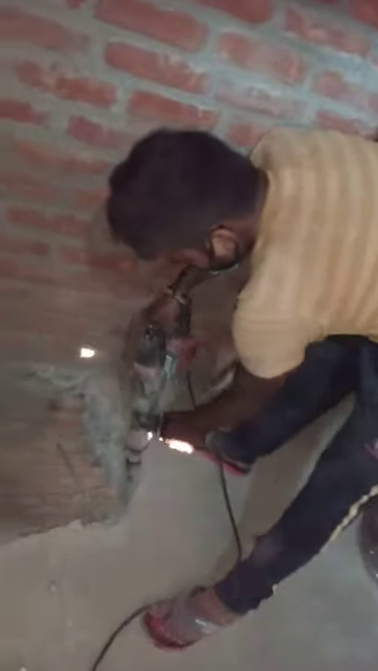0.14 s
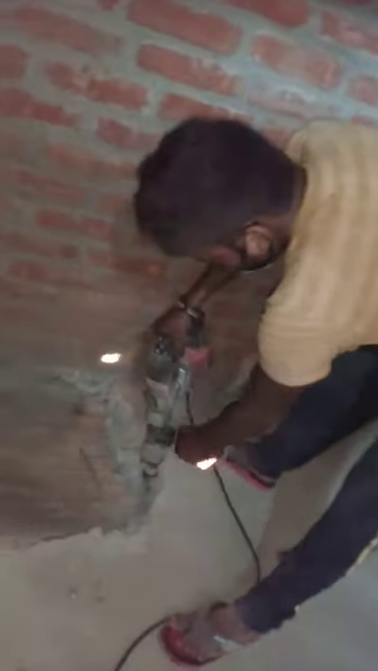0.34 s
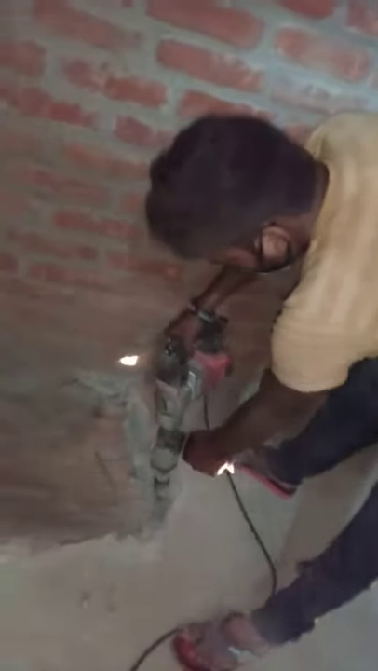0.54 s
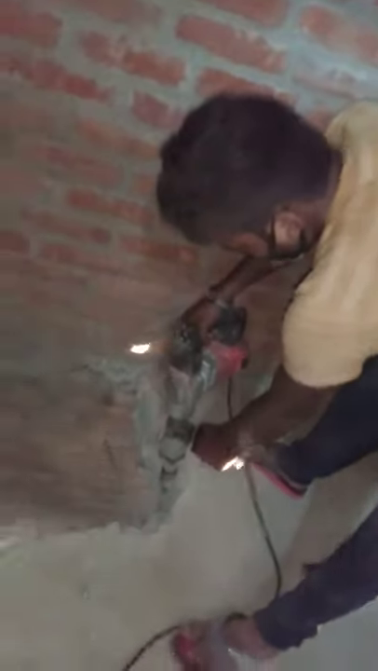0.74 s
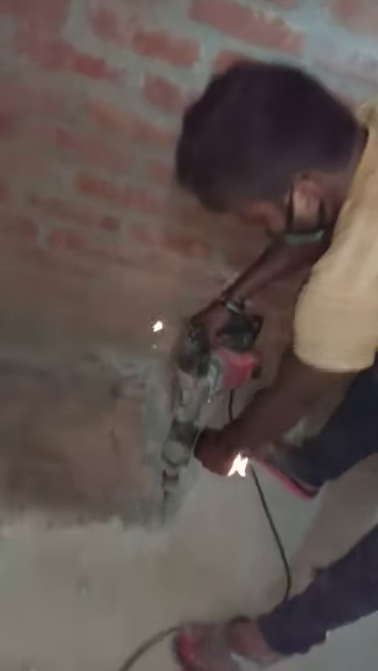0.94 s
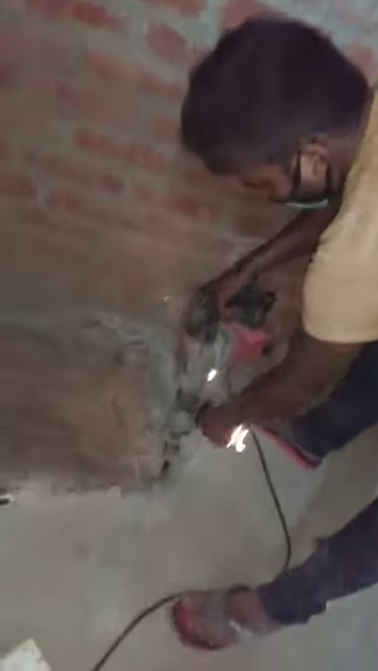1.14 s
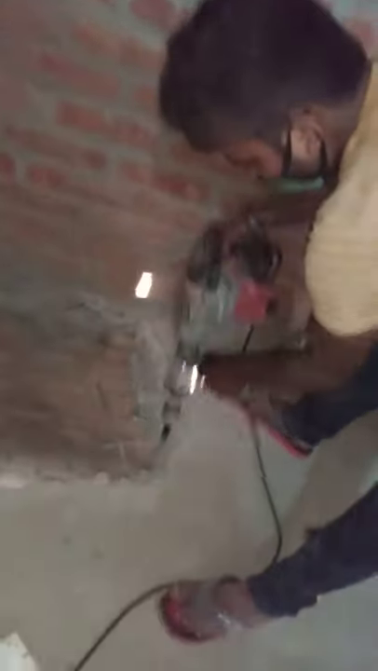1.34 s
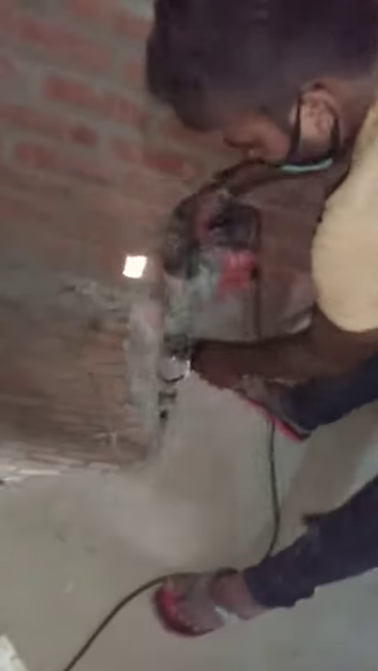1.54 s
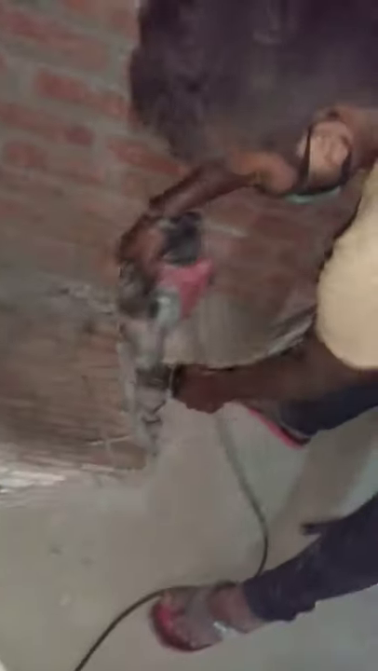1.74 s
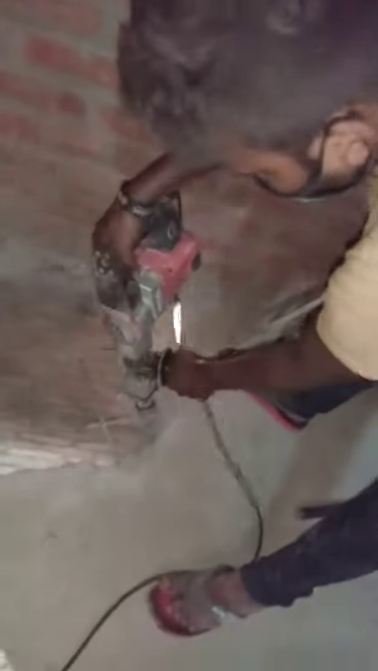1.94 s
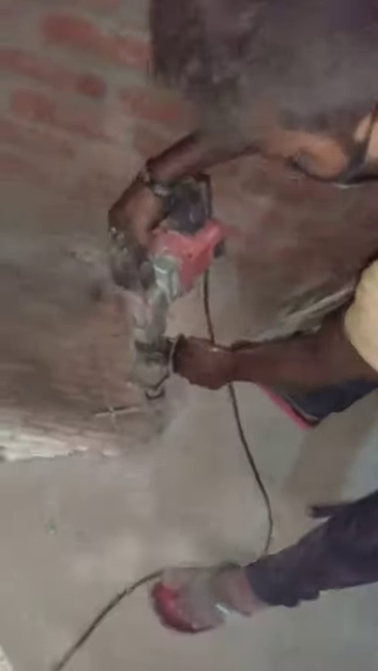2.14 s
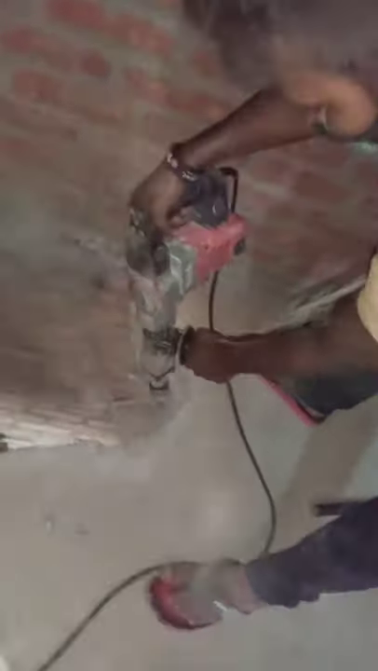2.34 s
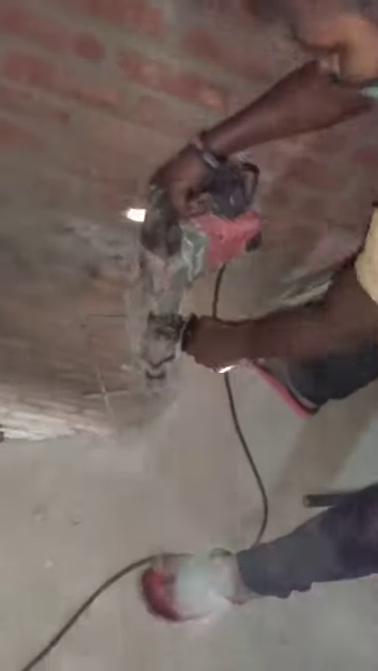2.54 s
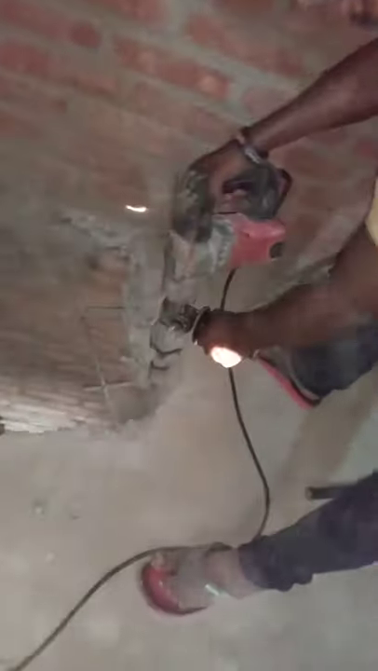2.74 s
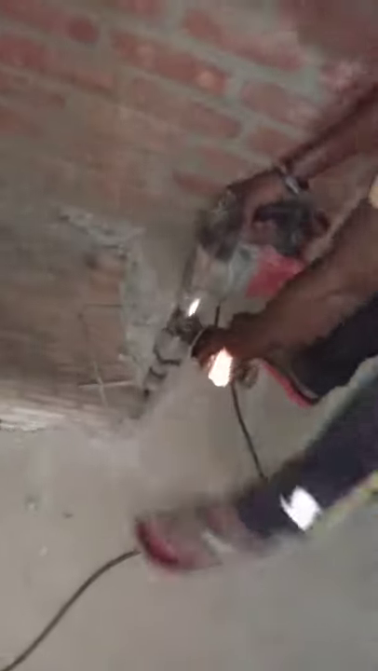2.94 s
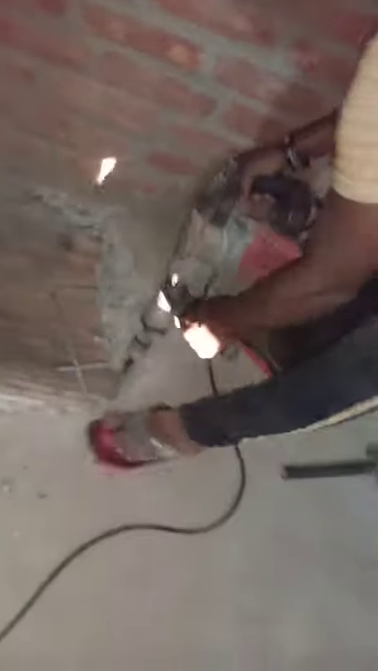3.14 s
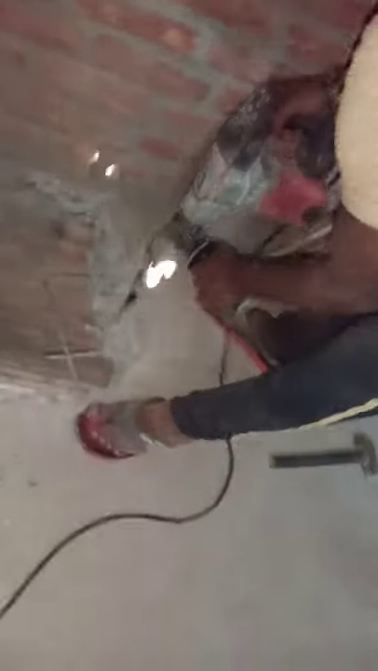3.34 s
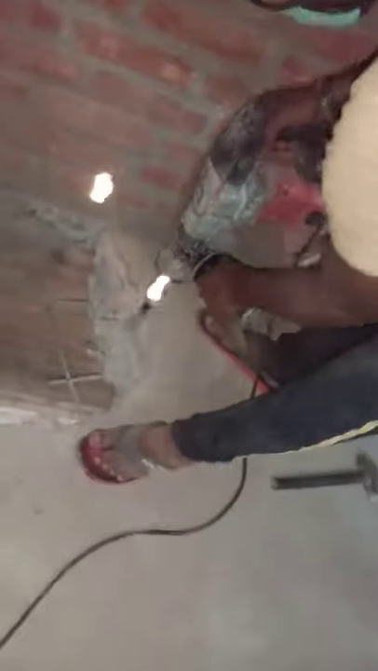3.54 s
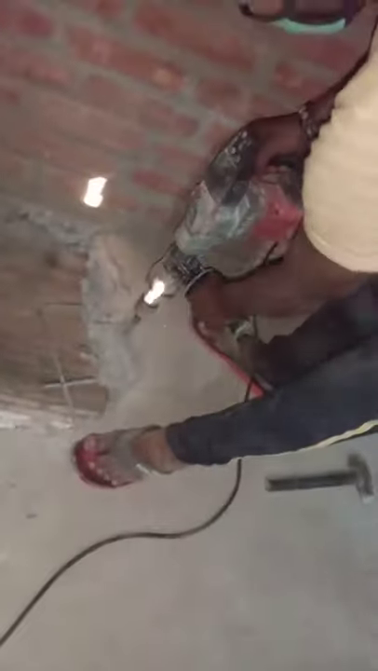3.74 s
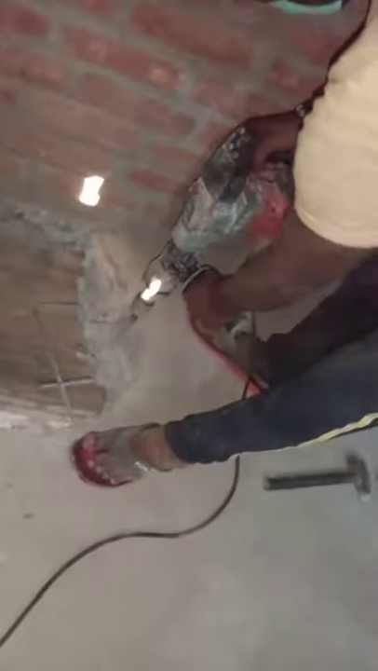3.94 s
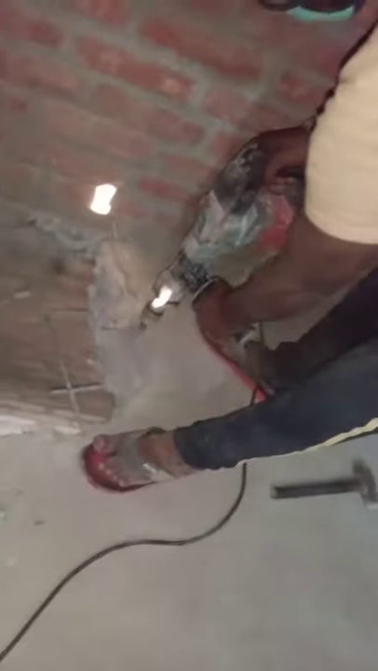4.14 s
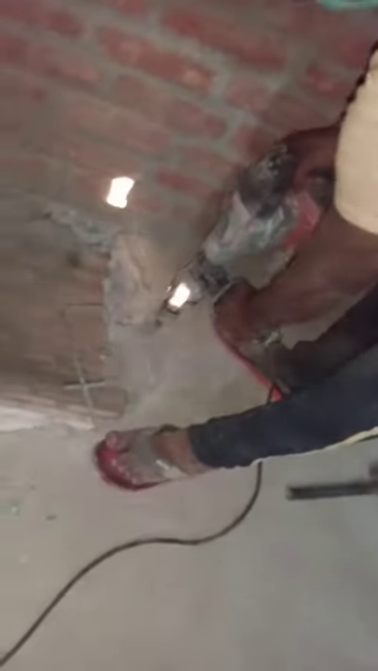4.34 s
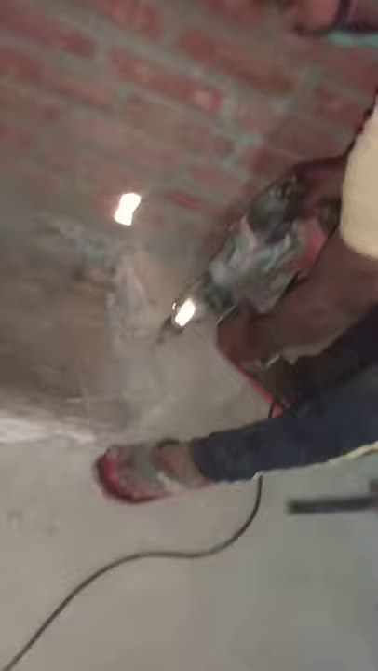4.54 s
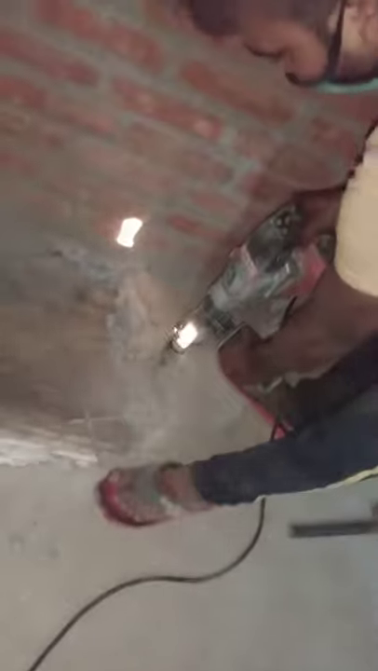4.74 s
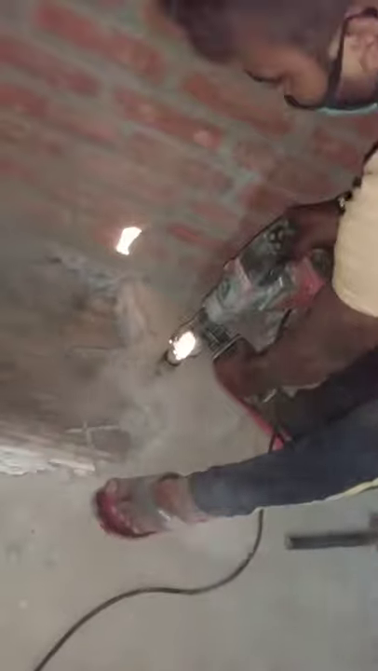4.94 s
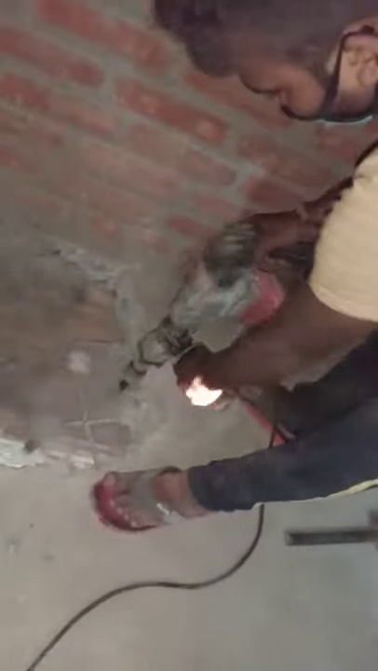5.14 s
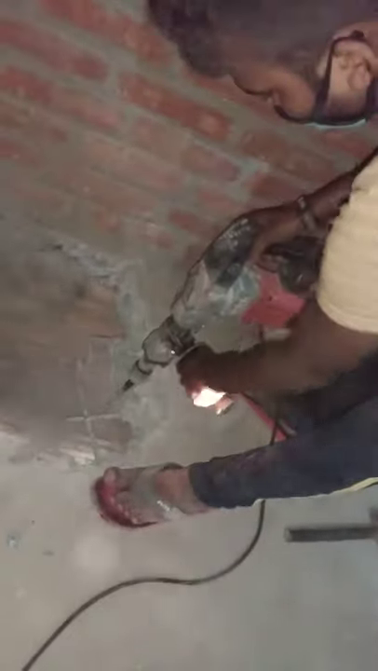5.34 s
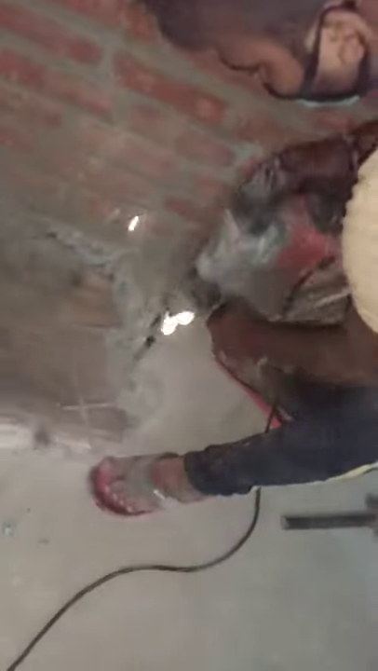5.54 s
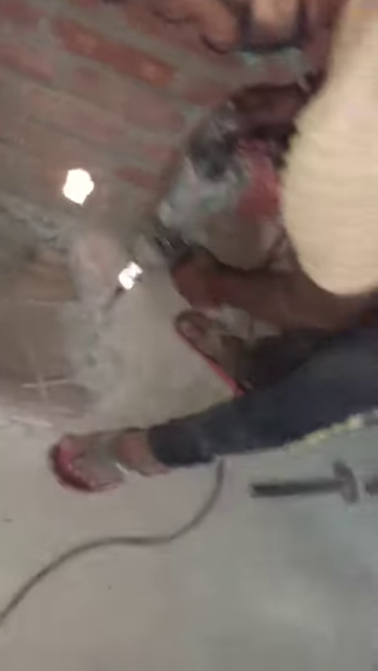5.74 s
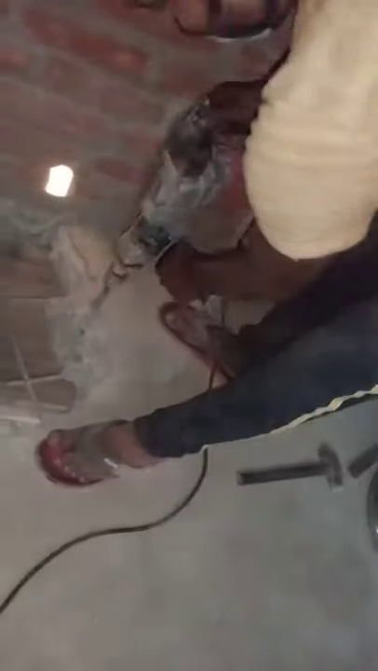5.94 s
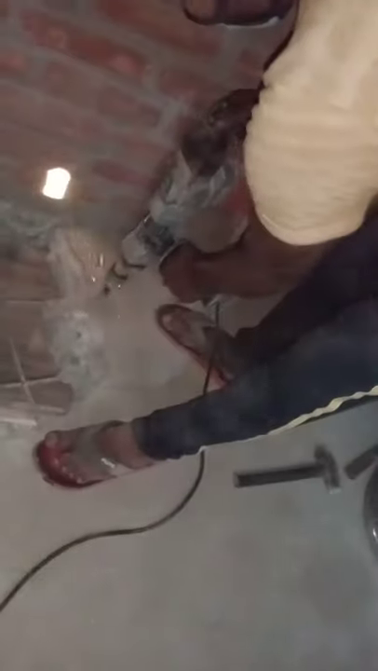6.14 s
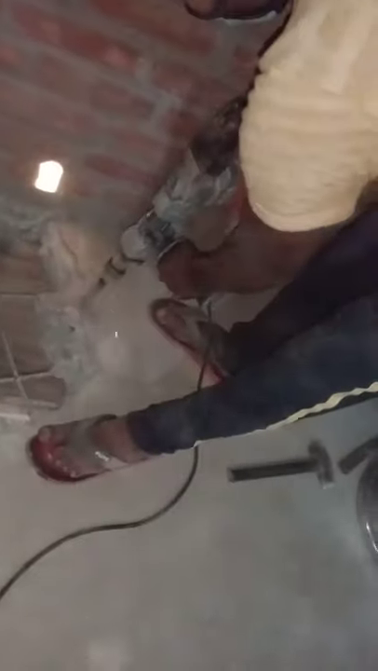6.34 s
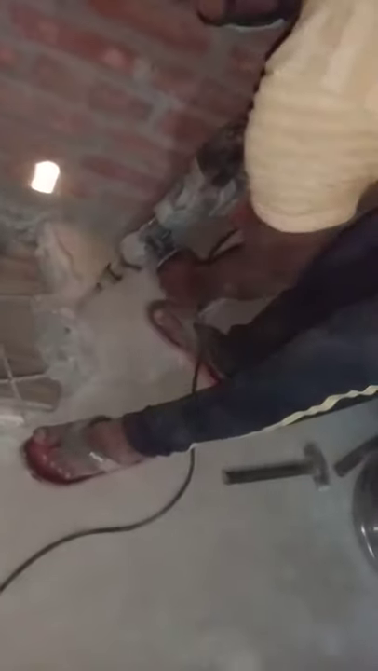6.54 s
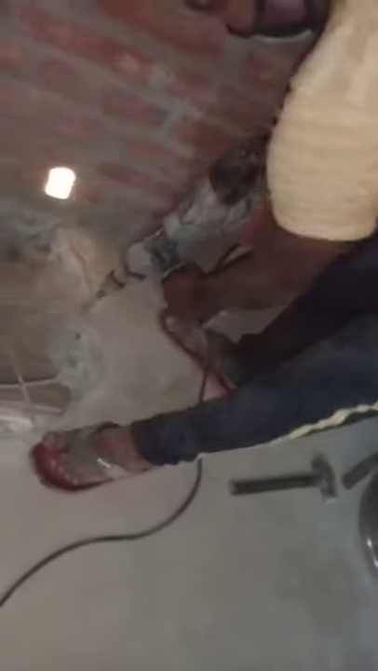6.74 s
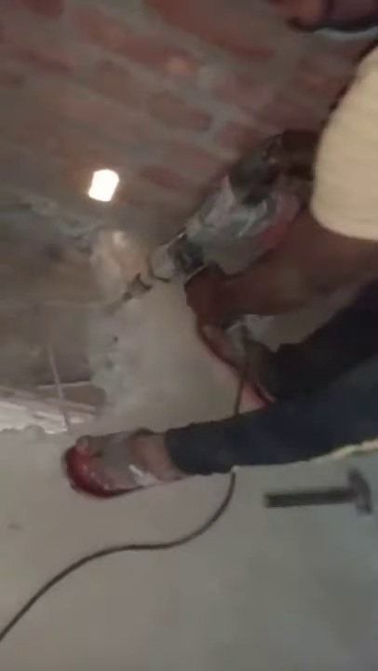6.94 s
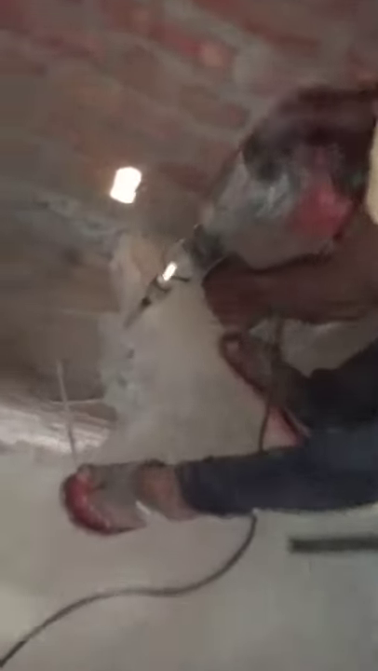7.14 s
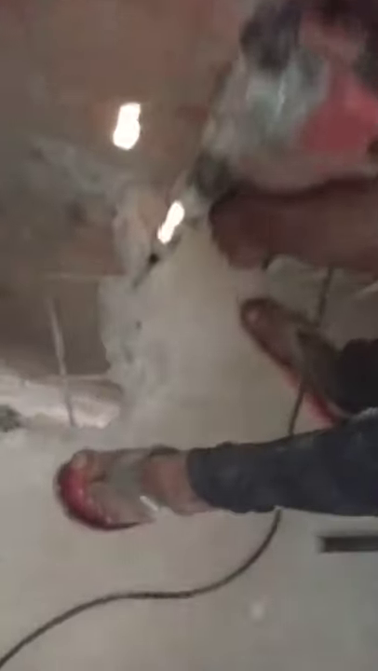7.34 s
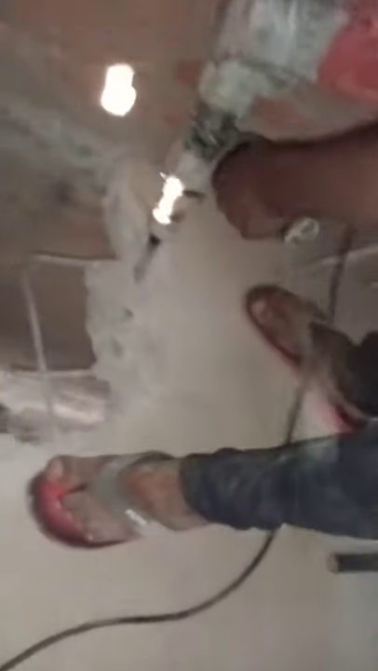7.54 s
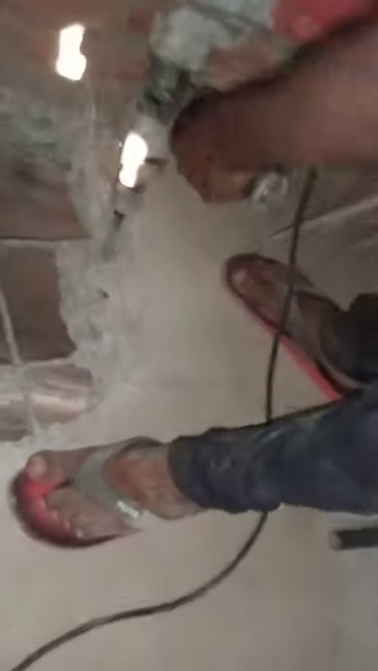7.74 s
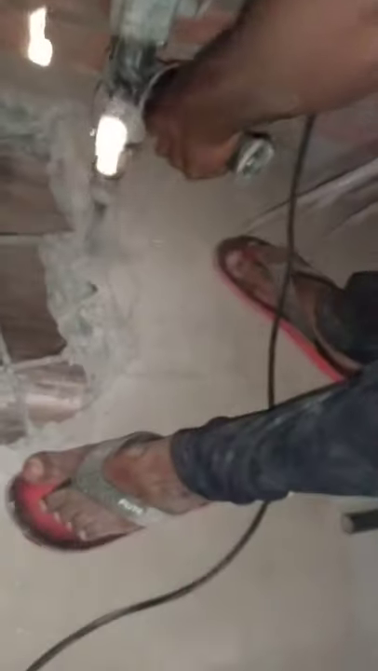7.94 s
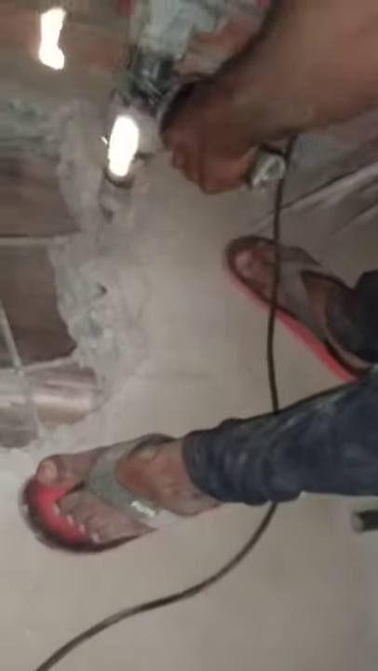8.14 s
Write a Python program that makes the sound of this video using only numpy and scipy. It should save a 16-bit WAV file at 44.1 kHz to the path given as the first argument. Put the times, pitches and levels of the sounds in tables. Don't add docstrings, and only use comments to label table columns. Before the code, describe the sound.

Close in a bare brick room, an electric demolition hammer is already pounding concrete at 0 s in short, bouncing bites, around 55 to 60 blows a second: dull slab thud, harsh metallic housing clatter, bright grit, sharp cracks and ringing steel. At 1 s the trigger releases; the clatter slows and softens, then from 1.4 s the tip scrapes rubble and loose parts jingle around 1.7 s. Hammering returns from 1.8 to 2.8 s, followed by a quieter coast-down with faint wavering motor hum. A longer, firmer burst fills 3.7 to 5.2 s. Scraping and sliding grains follow at 5.3 to 5.7 s, a strong scrape at 5.9 s, then choppier hammering until 7 s. After another falling rattle and slight debris, the final burst starts near 7.65 s and continues to the end. Brief room echo, faint low drone, small microphone with little deep bass.

```python
import sys
import numpy as np
from scipy import signal
from scipy.fft import rfft, irfft
from scipy.io import wavfile
from scipy.ndimage import uniform_filter1d

SR = 44100
rng = np.random.default_rng(int(sys.argv[2]) if len(sys.argv) > 2 else 0)


def amplitude_ratio(level_db):
    exponent = np.asarray(level_db, float) / 20
    return 10 ** exponent


def digitize_waveform(pressure):
    field = np.atleast_2d(pressure).T
    bounded = np.clip(field, -1, 1)
    quanta = np.round(bounded * 32767).astype(np.int16)
    wavfile.write(sys.argv[1], SR, quanta)


N = 365148

# freq_hz, level_db (dB per Hz)
SLAB = [(18, -61), (30, -18.5), (84, -4.5), (113, -1.5), (333, -1), (1500, -9), (1950, -56), (3300, -120)]
# freq_hz, level_db (dB per Hz)
HOUSING = [(120, -29.5), (200, -26.5), (395, -18), (534, -12), (803, -11.5), (884, -9), (972, -11),
           (1420, -7), (1520, -6.5), (1650, -3), (2170, -4), (3230, -2.5), (5200, -22), (6760, -18),
           (11400, -120)]
# freq_hz, level_db (dB per Hz)
GRIT = [(2470, 0.5), (4200, -0.5), (5240, -7.5), (5700, -6), (7230, 1), (7810, 6.5), (8490, 6.5),
        (10300, -5.5), (11000, -6.5), (15800, -11)]
# freq_hz, level_db (dB per Hz)
CRACK = [(3000, -24), (6000, -9), (9500, -2), (11000, -1), (13500, -2), (14900, -4), (15500, 2), (17000, 2)]
# on_s, off_s, loaded_speed (crank turns per s)
TRIGGER = [
    (-1, .985, 57.21),
    (1.774, 2.82, 56.62),
    (3.679, 5.189, 56.96),
    (5.959, 6.927, 57.41),
    (7.649, 9, 57.59),
]


def rms_one(x):
    return x / np.sqrt(np.mean(x ** 2) + 1e-20)


def coloured(x, spectrum):
    hz, db = np.transpose(spectrum)
    grid = np.maximum(np.arange(2049) * SR / 4096, 1)
    below_db = 15 * np.clip(np.log2(grid / hz[0]), -4, 0)
    log_gain = np.log(amplitude_ratio(np.interp(np.log(grid), np.log(hz), db) + below_db))
    cepstrum = irfft(log_gain)
    cepstrum[1:2048] *= 2
    cepstrum[2049:] = 0
    response = irfft(np.exp(rfft(cepstrum)))
    return rms_one(signal.fftconvolve(x, response)[:N])


def ring(clicks, hz, t60):
    r, w = amplitude_ratio(-60 / (t60 * SR)), 2 * np.pi * hz / SR
    return signal.lfilter([0, np.sin(w)], [1, -2 * r * np.cos(w), r * r], clicks + 1e-18)


def dying(clicks, rise_s, fall_s):
    rise, fall = np.exp(-1 / (np.array([rise_s, fall_s]) * SR))
    return signal.lfilter([1 - rise], np.convolve([1, -rise], [1, -fall]), clicks)


def contacts(grain_db):
    size_db = grain_db * np.minimum(rng.exponential(1, N), 6)
    return rms_one(amplitude_ratio(size_db) * rng.standard_normal(N))


def knocks(events):
    clicks = np.zeros(N)
    clicks[[round(s * SR) for s, db in events]] = amplitude_ratio(np.array(events)[:, 1])
    return clicks


def heard_in(force, first, first_db, second, second_db):
    both = amplitude_ratio(first_db) * coloured(force, first) + amplitude_ratio(second_db) * coloured(force, second)
    return both * np.std(force)


def louder(*dbs):
    return 10 * np.log10(sum(amplitude_ratio(db) ** 2 for db in dbs))


def held(rows, column, rise, sag, fall):
    t = np.arange(0, N + 32, 32) / SR
    rows = np.array(rows)[:, :, None]
    since, length = t - rows[:, 0], rows[:, 1]
    db = rows[:, column] + abs(rise) * np.minimum(since, 0)
    db = db - sag * np.clip(since, 0, length)
    db = db - abs(fall) * np.maximum(since - length, 0)
    return np.interp(np.arange(N) / SR, t, db.max(axis=0))


def powered(level_db, fall):
    rows = [(on + 0.057, off - on - .095, level_db) for on, off, loaded in TRIGGER]
    return held(rows, column=2, rise=530, sag=0, fall=fall)


def bite_level(column, rise, sag, fall):
    # start_s, length_s, thud_db, housing_db,
    # ring_db
    pressed_bites = [(.03, 0.15, -24, -20, -26), (.205, 0.084, -22.5, -20, -30), (.41, 0.076, -24, -20.5, -30),
                     (.545, 0.098, -23.5, -22, -28), (.71, 0.066, -26, -23.5, -31), (.875, 0.026, -26, -23, -31),
                     (1.005, 0.018, -42, -27, -33.5), (1.69, .015, -31.5, -32, -36), (1.71, 0.059, -30.5, -24, -22),
                     (1.8, 0.15, -26, -25, -27), (2.945, 0.0089, -31, -26, -28.5), (5.0, 0.019, -26.5, -23, -30),
                     (5.115, 0.043, -33, -22, -29), (6.29, 0.12, -23.5, -20, -28), (6.48, 0.068, -26.5, -20.5, -28),
                     (6.6, 0.073, -25.5, -23.5, -30.5), (6.8, 0.09, -24.5, -21.5, -32),
                     (6.95, 0.055, -27.5, -24, -33), (7.044, 0.015, -32, -31, -30.5),
                     (7.705, 0.08, -25.5, -22, -28.5), (7.825, 0.12, -24, -18, -27.5),
                     (1.975, .25, -22, -19, -26), (2.26, .2, -24, -20, -34), (2.47, .335, -26.5, -24, -31),
             (3.697, .16, -25, -21, -22), (3.866, 0.21, -25.5, -22.5, -29.5),
             (4.134, 0.23, -23.5, -19.5, -28), (4.396, 0.32, -25, -20.5, -27.5),
             (4.728, 0.24, -25.5, -24, -29), (5.876, 0.115, -26, -24.5, -29),
             (5.997, 0.21, -23.5, -18.5, -26.5), (7.999, 0.35, -25, -19.5, -29)]
    return held(pressed_bites, column, rise, sag, fall)


def drag_levels():
    # start_s, length_s, housing_db, grit_db
    drags = [(1.39, .06, -25.5, -28.5), (1.46, 0.14, -20.5, -28), (1.655, 0.045, -21, -30),
             (3.16, .05, -50, -39), (3.26, 0.036, -29.5, -38), (5.34, .05, -22.5, -31),
             (5.42, 0.045, -23, -33), (5.485, 0.067, -22.5, -29.5), (5.58, 0.061, -31, -33.5),
             (5.866, .05, -15, -27), (7.27, .05, -38, -34.5), (7.655, 0.045, -32, -35)]
    return held(drags, column=2, rise=920, sag=10, fall=300), held(drags, column=3, rise=330, sag=5.4, fall=125)


def spot(column):
    # start_s, grit_over_housing_db, tip_over_shank_db, crack_over_housing_db, idle_housing_db
    spots = [
        (0, 1, -10, -26, -29.5),
        (1.65, 0, -8, -21, -31.5),
        (3.68, -3, -7, -19, -35),
        (4.4, -2.5, -5, -22, -28),
        (5.84, -4.5, -3.5, -19, -31.5),
        (6.72, -1, -7, -17, -30.5),
        (7.66, -2.5, -3.5, -18.5, -27),
    ]
    rows = np.array(spots)
    current = np.maximum(np.searchsorted(rows[:, 0], np.arange(N) / SR) - 1, 0)
    return rows[current, column]


def during(rows, t):
    return sum((t >= row[0]) & (t < row[0] + row[1]) for row in rows) > 0


def motor_speed():
    # start_s, length_s
    resisted = [(.03, .16), (.205, .095), (.41, .09), (.545, .11), (.71, .09), (.875, .04), (1.8, .14),
                (1.97, .83), (3.69, .39), (4.13, .85), (5, .035), (5.115, .055), (5.875, .36), (6.29, .13),
                (6.48, .075), (6.6, .09), (6.8, .11), (7.705, .09), (7.825, .14), (7.995, .3)]
    start_speed, free_speed = 39.23, 68.49
    spin_up_s, coast_s = .111, 1.508
    step = 64 / SR
    t = np.arange(0, N / SR + step, step)
    on, off, loaded = np.transpose(TRIGGER)[:, :, None]
    power = (np.clip((t - on) / step, 0, 1) * np.clip((off - t) / step, 0, 1)).sum(axis=0)
    loaded_speed = loaded[np.searchsorted(on[:, 0], t) - 1, 0]
    goal = np.where(during(resisted, t), loaded_speed, free_speed)
    speed = [start_speed]
    for aim, share in zip(goal, power):
        pull = share * (aim - speed[-1]) / spin_up_s
        friction = (1 - share) * speed[-1] / coast_s
        speed.append(speed[-1] + step * (pull - friction))
    return np.interp(np.arange(N) / SR, t, speed[1:])


def crank():
    return .54 + np.cumsum(motor_speed()) / SR


def blows(spread_db, rebound_db):
    at = np.r_[0, np.flatnonzero(np.diff(np.floor(crank())))]
    chance = rng.standard_normal((len(at), 4))
    clicks = np.zeros(N + SR)
    clicks[at + (abs(chance[:, 0]) * .0006 * SR).astype(int)] = amplitude_ratio(spread_db * chance[:, 1])
    rebound_s = 0.00786 + 0.0026 * np.clip(chance[:, 2], -2, 2)
    clicks[at + (rebound_s * SR).astype(int)] = amplitude_ratio(rebound_db + 2 * spread_db * chance[:, 3])
    return clicks[:N]


def shower(clicks, level_db, spectrum, rise_s, fall_s, steady, grain_db):
    mean = uniform_filter1d(dying(clicks, rise_s, fall_s), size=SR // 16)
    burst = dying(clicks * amplitude_ratio(level_db), rise_s, fall_s) / mean
    steady = np.clip(steady, 0, 1)
    force = ((1 - steady) * burst + steady * amplitude_ratio(level_db)) * contacts(grain_db)
    return coloured(force, spectrum) * np.std(force)


def steel(modes, level_db):
    out = np.zeros(N)
    for hz, mode_db, t60 in modes:
        taps = blows(spread_db=2.0, rebound_db=-4)
        chatter = .12 * dying(taps, .0003, .003) * rng.standard_normal(N)
        struck = taps + chatter
        out += amplitude_ratio(mode_db) * ring(struck * amplitude_ratio(level_db), hz, t60) / np.std(ring(struck, hz, t60))
    return out


def chisel(shank_db, tip_db):
    # freq_hz, level_db, t60_s
    shank = [(7615, 0, .035), (7850, -6, .02)]
    # freq_hz, level_db, t60_s
    tip = [(12140, -2, .04), (12565, 0, .065)]
    return steel(shank, shank_db - 1.0) + steel(tip, tip_db + 0.5)


def loose_parts(rattle_db):
    # freq_hz, level_db, t60_s
    retainer = [(1805, 0, 0.12), (1697, -7, 0.018)]
    # freq_hz, level_db, t60_s
    collar = [(2597, -0.5, 0.045)]
    # freq_hz, level_db, t60_s
    handle = [(326, 1.5, 0.19)]
    # freq_hz, level_db, t60_s
    case = [(614, 1, 0.047), (890, -7, 0.21)]
    # start_s, length_s, retainer_db, collar_db, handle_db
    shakes = [
        (.42, 0.075, -42, -28, -70),
        (1.29, .12, -34.5, -50, -70),
        (1.675, .04, -34, -26, -70),
        (5.36, 0.38, -46, -43, -50),
        (6.25, 0.24, -46, -33, -70),
        (6.7, 0.35, -46, -38, -70),
        (7.38, 0.18, -51, -51, -70),
        (7.64, .06, -49, -33, -70),
    ]
    retainer_db, collar_db, handle_db = (held(shakes, column=k, rise=94, sag=4.2, fall=69) for k in range(2, 5))
    idle_db = -45.5
    loose = steel(retainer, louder(retainer_db, idle_db))
    loose = loose + steel(collar, louder(collar_db, rattle_db - 13, idle_db - 3))
    return loose + steel(handle, handle_db) + steel(case, -51)


def chips(bite_db):
    odd_moments = rng.random(N) < 140 / SR
    size_db = 4.0 * np.minimum(rng.exponential(1, N), 4)
    snaps = odd_moments * amplitude_ratio(size_db) * rng.choice([-1, 1], N)
    return heard_in(rms_one(snaps) * amplitude_ratio(bite_db), SLAB, -7, HOUSING, -6)


def solid_blows():
    # start_s, peak_db
    solid = [(0.032, 0.5), (0.207, 2), (0.423, -4), (0.556, -20), (0.896, 2), (1.741, -23), (1.975, -17),
             (2.781, 2), (2.943, -27), (3.692, 1), (5.021, -5.5), (5.122, -0.5), (5.154, 0.5), (6.706, -5),
             (6.801, -23), (6.957, -12), (7.044, -15), (7.825, -25), (7.995, -5)]
    force = dying(knocks(solid), 0.00016, 0.0038) * contacts(grain_db=5.0)
    return heard_in(force, SLAB, -13.0, HOUSING, -12.5) + heard_in(force, GRIT, -14.5, CRACK, -18)


def scraping(clicks, dragged_db):
    # freq_hz, level_db (dB per Hz)
    scrape = [(1300, -24), (2200, -2), (3300, -1), (4300, -6.5), (4900, -14), (6500, -13), (9000, -62)]
    return shower(clicks, dragged_db - 4, scrape, rise_s=.0004, fall_s=0.0074, steady=0.61, grain_db=0.5)


def slides():
    # start_s, peak_db
    falls = [(1.3544, -25), (1.3964, -22.5), (1.4594, -23), (1.6566, -19.5), (3.262, -26.5), (5.336, -27),
             (5.4226, -25), (5.4884, -28), (5.5994, -28), (7.2784, -25), (7.305, -24), (1.69, -30)]
    force = dying(knocks(falls), 0.0041, 0.024) * contacts(grain_db=-2.0)
    return heard_in(force, GRIT, -1.3, CRACK, -20)


def hammer():
    bite_db = louder(bite_level(column=2, rise=1000, sag=5.6, fall=620), powered(-39, fall=650), -52)
    rattle_db = louder(bite_level(column=3, rise=2300, sag=6.4, fall=700), powered(-31, fall=68))
    ring_db = louder(bite_level(column=4, rise=1500, sag=7.8, fall=460), powered(-36, fall=250))
    dragged_db, rush_db = drag_levels()
    pace_db = 0.02 * (motor_speed() - 45)
    idle_db = spot(column=4) + pace_db
    housing_db = louder(rattle_db, dragged_db - 6.5, idle_db)
    grit_db = louder(rattle_db + spot(column=1), rush_db, -40.5 + pace_db)
    crack_db = louder(rattle_db + spot(column=3), rush_db - 45, -56)
    shank_db = louder(ring_db, -72)
    tip_db = louder(ring_db + spot(column=2), -88)
    bite_db = bite_db + 2 * np.minimum(bite_db + 48, 0)
    drag = 1.1 * amplitude_ratio(rush_db - grit_db) ** 2
    drag = np.maximum(drag, .15 * amplitude_ratio(idle_db - housing_db) ** 2)

    clicks = blows(spread_db=2.0, rebound_db=-8)
    slab = shower(clicks, bite_db + 1.5, SLAB, rise_s=.001, fall_s=.006, steady=.18, grain_db=3.5)
    housing = shower(clicks, housing_db - 1.5, HOUSING, rise_s=.0004, fall_s=.006,
                     steady=.4 + .5 * drag, grain_db=2.2)
    grit = shower(clicks, grit_db - 2.5, GRIT, rise_s=.0002, fall_s=.007, steady=.48 + .45 * drag, grain_db=1.6)
    crack = shower(clicks, crack_db + 7, CRACK, rise_s=.0001, fall_s=.005, steady=.28 + .6 * drag, grain_db=1.5)
    rings = chisel(shank_db, tip_db) + loose_parts(rattle_db)
    rubble = scraping(clicks, dragged_db) + slides()
    return slab + housing + grit + crack + rings + chips(bite_db) + solid_blows() + rubble


def armature():
    # start_s, length_s, level_db
    hums = [
        (1.16, 0.062, -47.5),
        (1.3, 0.2, -55),
        (3.02, 0.081, -50),
        (3.28, 0.098, -53.5),
        (3.58, 0.087, -50),
        (7.42, 0.064, -55),
        (7.59, .06, -56),
    ]
    waver = rms_one(uniform_filter1d(rng.standard_normal((2, N)), size=SR // 25))
    speed = motor_speed()
    hum_hz = 6.0 * speed * (1 + 0.0156 * waver[1])
    hum_db = held(hums, column=2, rise=460, sag=5, fall=130) + 2.5 + 2.4 * waver[0]
    hum = amplitude_ratio(hum_db) * np.sin(2 * np.pi * np.cumsum(hum_hz) / SR)

    acceleration = uniform_filter1d(np.gradient(speed) * SR, size=SR // 50)
    pull_db = 0.06 * np.clip(acceleration, 0, 250)
    speed = speed * (1 + .006 * waver[0])
    muffled_db = -1.2 * np.maximum(speed - 52, 0) - 1.5 * np.maximum(41 - speed, 0)
    whine_db = -42 + pull_db + muffled_db + 2.5 * waver[1]
    bars_passed = 70.5 * np.cumsum(speed) / SR
    return hum + amplitude_ratio(whine_db) * np.sin(2 * np.pi * bars_passed)


def room(x):
    t60_s = .3
    t = np.arange(SR // 2) / SR
    tail = rng.standard_normal(len(t)) * amplitude_ratio(-60 * t / t60_s) * (t > .004)
    tail = signal.sosfilt(signal.butter(1, [600, 7000], "band", fs=SR, output="sos"), tail)
    return signal.fftconvolve(x, tail / np.linalg.norm(tail))[:N]


def site_rumble():
    # freq_hz, level_db (dB per Hz)
    room_tone = [(18, -63), (30, -34), (86, -49), (160, -44), (178, -17), (243, 7), (300, 1), (390, -45),
                 (660, -120)]
    return amplitude_ratio(-65) * coloured(rng.standard_normal(N), room_tone)


def scene():
    tool = hammer() + armature()
    return (tool + amplitude_ratio(-18) * room(tool) + site_rumble())[None, :]


def low_pass(x):
    return signal.sosfilt(signal.butter(12, 16900, fs=SR, output="sos"), x)


def record(dry):
    x = signal.sosfilt(signal.butter(3, 52, "high", fs=SR, output="sos"), dry)
    x = .75 * np.tanh(x / .75)
    x = signal.sosfilt(signal.ellip(12, .5, 70, 15830, fs=SR, output="sos"), x)
    return low_pass(x)


dry = scene()
out = record(dry)
digitize_waveform(out)
```